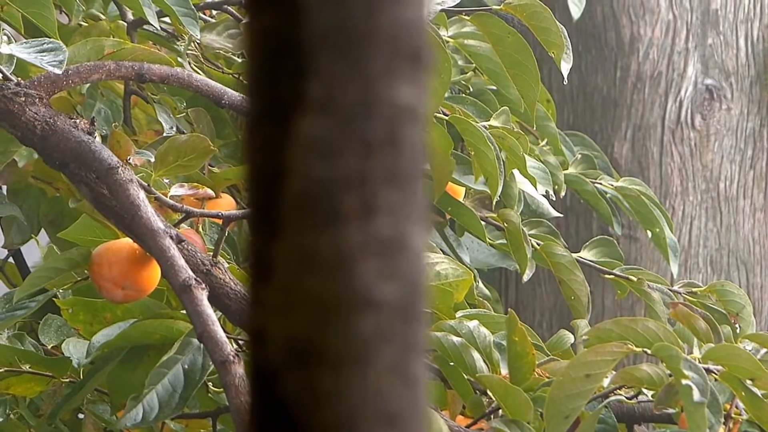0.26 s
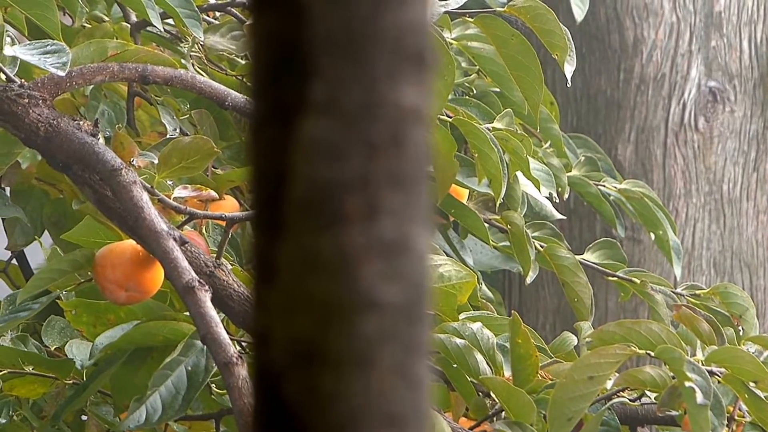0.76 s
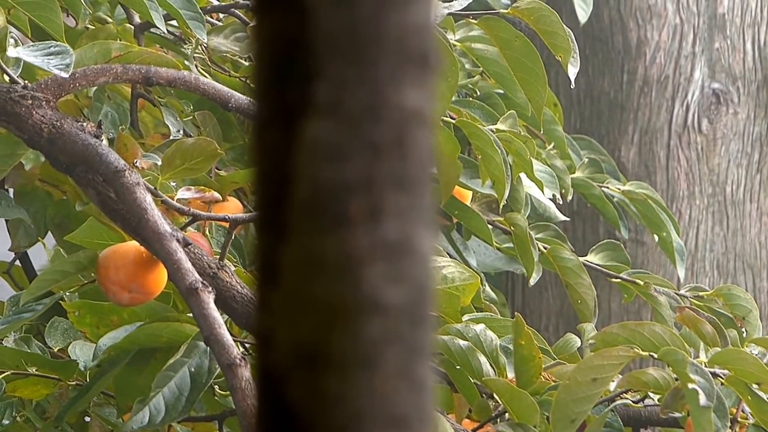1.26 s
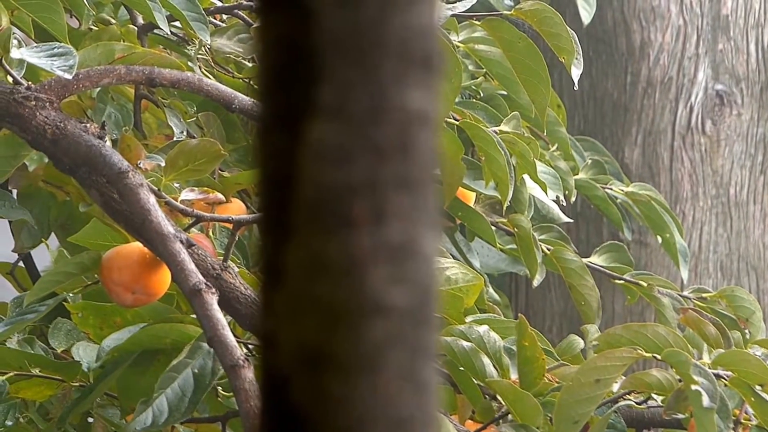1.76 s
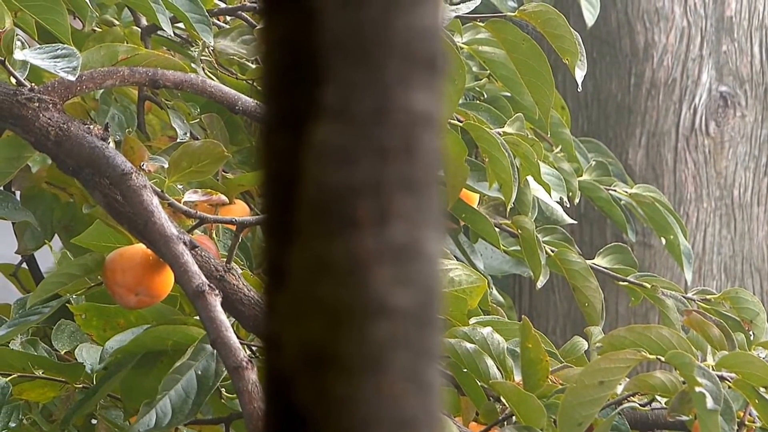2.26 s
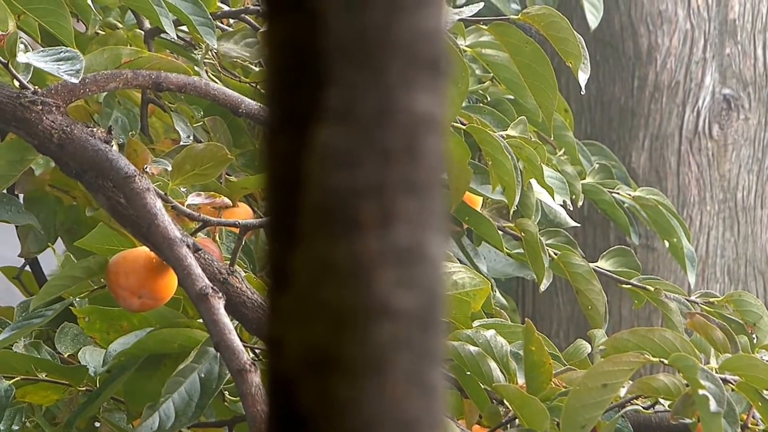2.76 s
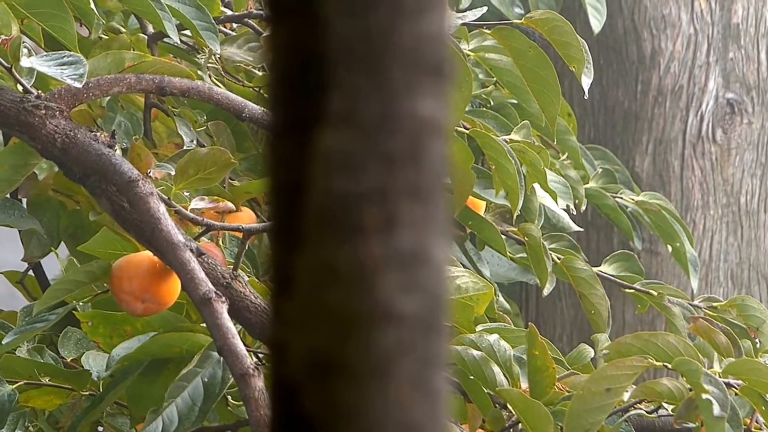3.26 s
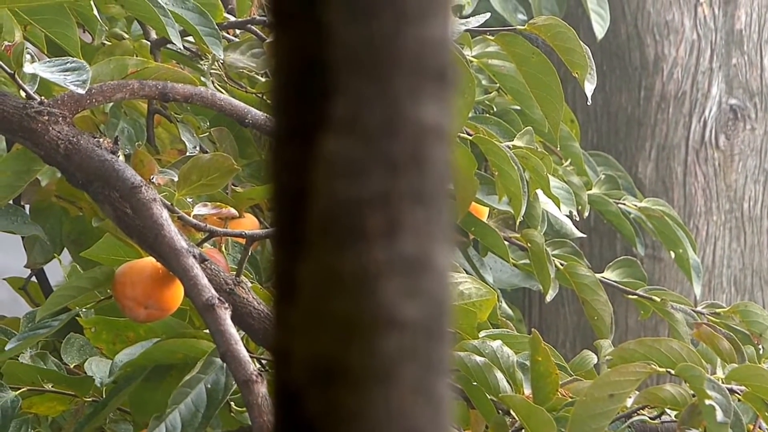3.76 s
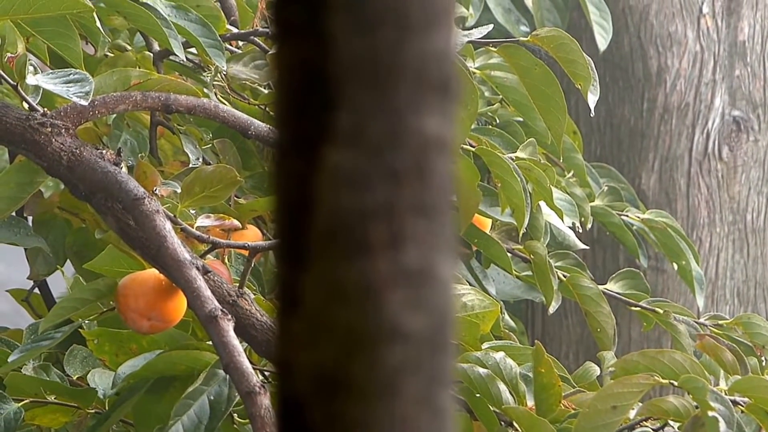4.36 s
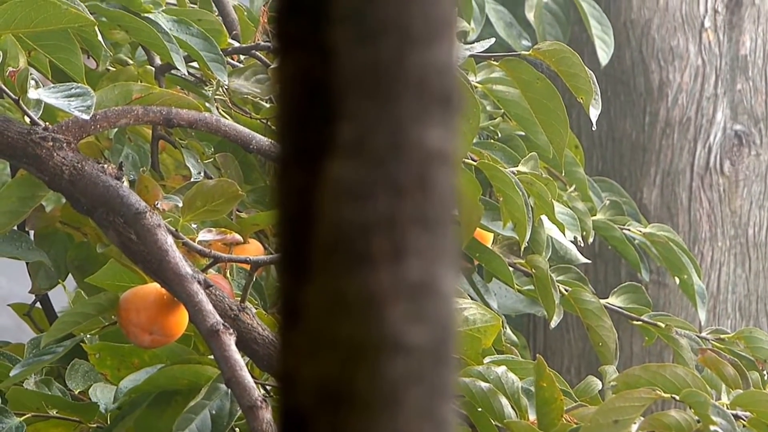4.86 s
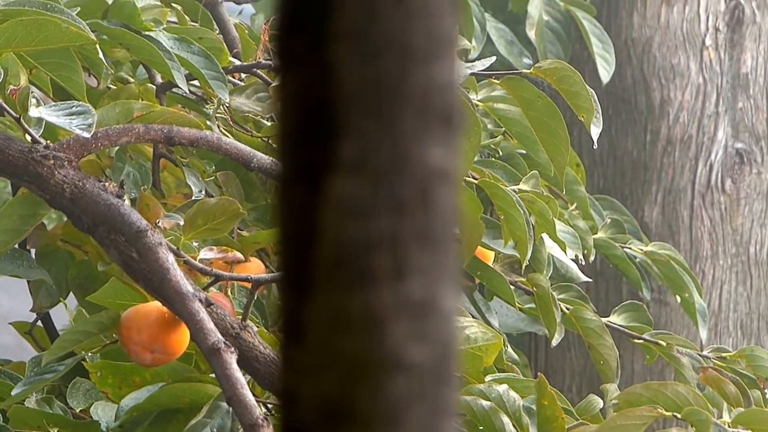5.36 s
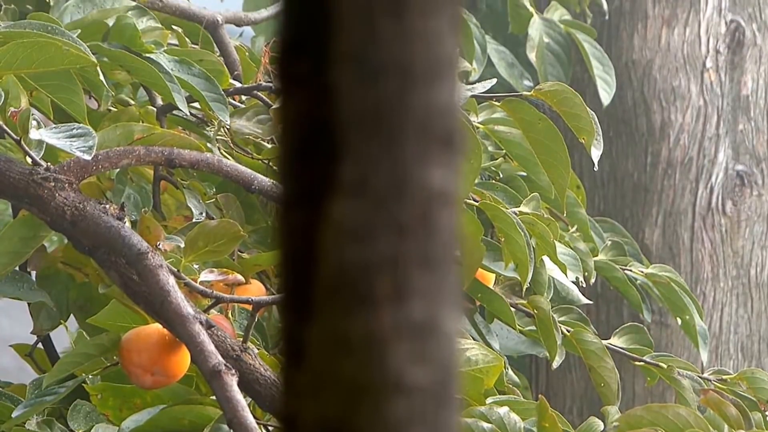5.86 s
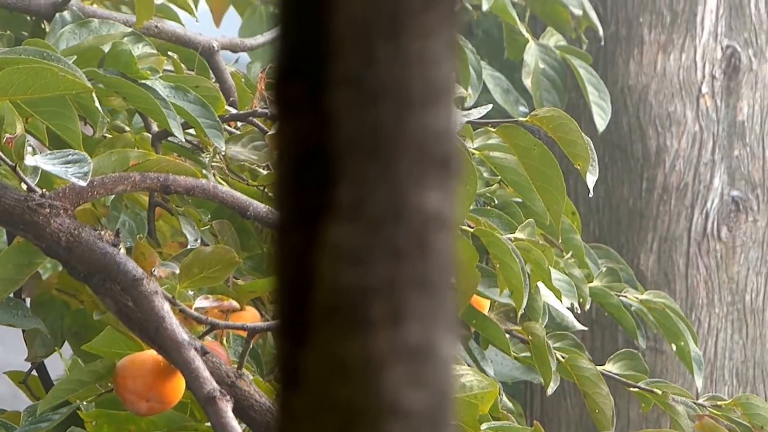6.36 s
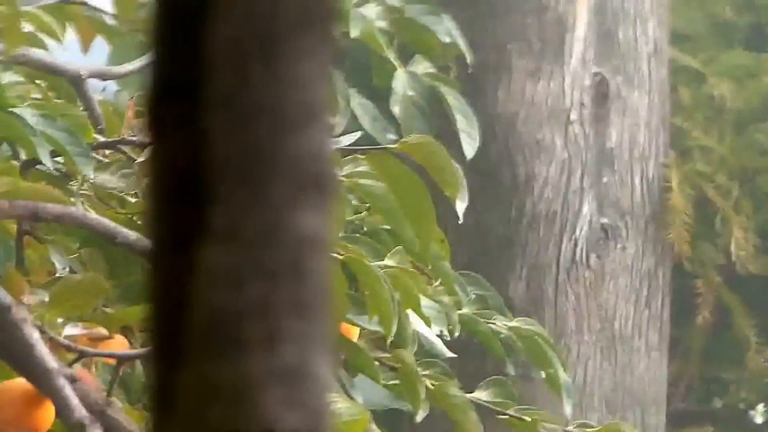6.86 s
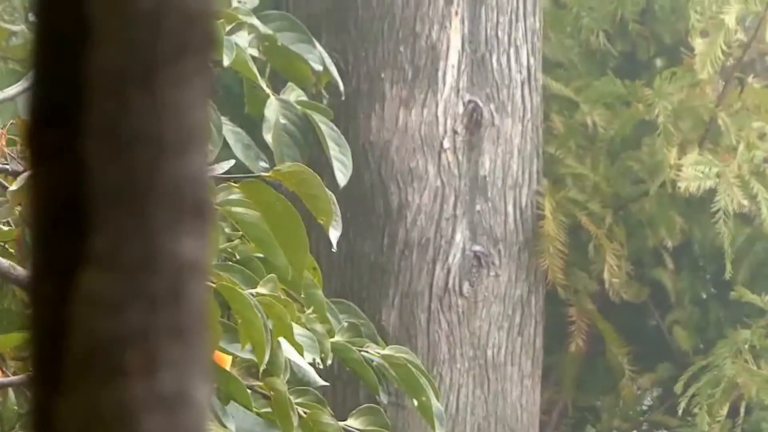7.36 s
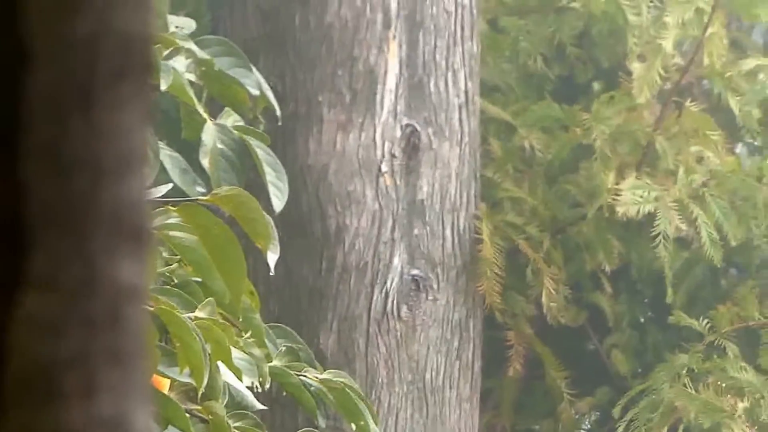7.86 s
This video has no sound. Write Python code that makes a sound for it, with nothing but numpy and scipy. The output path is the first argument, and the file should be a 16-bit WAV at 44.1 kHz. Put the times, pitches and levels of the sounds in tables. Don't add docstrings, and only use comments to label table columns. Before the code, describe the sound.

A harsh bird call dominates a quiet residential garden. Four quiet, breathy scolds lead to a long, even chatter of short buzzing notes, loudest near the middle, then lower and rougher. A dull thud and a breath of wind follow, then scattered rough scolds, small ticks and a tiny far whistle. Low hum and soft hiss lie beneath; gusts buffet the outdoor stereo microphone, and leaves scatter the calls.

```python
import sys
import numpy as np
from scipy import signal
from scipy.fft import rfft, irfft, next_fast_len
from scipy.io import wavfile

SR = 44100
rng = np.random.default_rng(int(sys.argv[2]) if len(sys.argv) > 2 else 0)


def voltage_ratio(decibels):
    exponent = np.asarray(decibels, float) / 20
    return 10 ** exponent


def transcribe(signal):
    frames = np.atleast_2d(signal).T
    limited = np.clip(frames, -1, 1)
    pcm = np.round(limited * 32767).astype(np.int16)
    wavfile.write(sys.argv[1], SR, pcm)


N = 357651


def rms_one(x):
    return x / np.sqrt(np.mean(x ** 2) + 1e-20)


def at_hz(points, hz):
    table_hz, values = np.transpose(points)
    return np.interp(np.log(hz), np.log(np.maximum(table_hz, 1)), values)


def butter(x, order, hz, kind="low"):
    return signal.sosfilt(signal.butter(order, hz, kind, fs=SR, output="sos"), x)


def wander(shape, hz):
    return rms_one(butter(rng.standard_normal(shape), 2, hz))


def resonate(x, hz, width_hz):
    r = np.exp(-np.pi * width_hz / SR)
    poles = [1, -2 * r * np.cos(2 * np.pi * hz / SR), r * r]
    return signal.lfilter(np.array([1, 0, -1]) * (1 - r * r) / 2, poles, x)


def panned(x, db):
    return np.array([x * voltage_ratio(db / 2), x * voltage_ratio(-db / 2)])


def add(out, s, x):
    i = round(s * SR)
    out[..., i:i + x.shape[-1]] += x[..., :N - i]


# [t/s,
# level/dB, pitch f/Hz, length/ms, third overtone level/dB: higher when facing the listener]
SCOLDS = [(1.2328, -50.5, 1443, 52, -6), (1.3867, -49.5, 1492, 41, -11), (1.5214, -48.5, 1512, 38.5, -11),
          (1.645, -48, 1470, 51.6, -11), (6.5913, -43, 1626, 39.2, -10), (6.7211, -40, 1814, 30, -4),
          (7.2517, -44, 1618, 27.8, 0), (7.378, -41, 1635, 25.7, 3), (7.552, -41.5, 1605, 27, -6),
          (7.95, -42.5, 1644, 34, 3), (8.1038, -42, 1620, 22, 0),
          (2.0765, -49.5, 1452, 47, -11), (2.209, -42.5, 1596, 31, -13), (2.329, -41, 1690, 32, -13),
         (2.4383, -39.5, 1748, 41.5, -0.5), (2.5584, -41.5, 1713, 47.5, 0.5), (2.6841, -43, 1818, 62, -1.5),
         (2.827, -43, 1746, 51, 2), (2.9706, -43, 1710, 52, -0.5), (3.0949, -40, 1750, 46, -0.5),
         (3.23, -41, 1752, 42.6, -2.5), (3.3544, -39.5, 1770, 38.5, -5), (3.476, -39.5, 1783, 39, -2.5),
         (3.5981, -39.5, 1786, 39, -4), (3.7183, -40, 1780, 48.4, -4), (3.835, -36.5, 1902, 36.6, -3),
         (3.9598, -38.5, 1887, 39.6, -5), (4.0839, -38, 1770, 37, -1), (4.213, -37.5, 1703, 39.5, -8.5),
          (4.391, -38.5, 1650, 30.1, -12), (4.5371, -36.5, 1710, 27.8, -12), (4.6529, -37.5, 1706, 30.1, -2),
       (4.7716, -40.5, 1605, 42.5, -7.5), (4.9069, -39, 1688, 31.7, -6), (5.0317, -40.5, 1635, 30.2, -4.5),
       (5.17, -40.5, 1620, 26.3, -8.5), (5.3055, -41.5, 1642, 27.8, -9.5), (5.4206, -41.5, 1618, 29.1, -3),
       (5.5256, -40, 1625, 30.9, -3), (5.662, -41, 1634, 29.5, -2), (5.7649, -41, 1475, 46, -5),
       (5.904, -40, 1649, 51.3, -12)]
# [t/s, fundamental level/dB, fourth overtone level/dB re third, rasp level/dB, roughness 0-1]
THROAT = [(1.2, -3.5, -17, -0.5, 0.3), (2.1, -8.5, -20, -7, 0.32), (2.44, -12, -21, 0, .28),
          (2.9, -6, -14, 2.5, 0.32), (3.2, -10.5, -19, -2, .3), (3.75, -8.5, -15, -3, 0.3),
          (4.0, -7, -21, 4.5, 0.37), (4.3, -16.5, -14, -1.5, 0.35), (4.92, -14, -12, 2, .38),
          (5.03, -11, -9, 3.5, 0.39), (5.55, -11, -4.5, 4, .45), (5.76, -6, -1, -3.5, 0.56),
          (5.9, -12, -4, 2.5, 0.21), (6.7, -7, -6.5, 5.5, 0.22), (7.4, -0.5, -7.5, 2, 0.7),
          (7.55, -5.5, -2.5, -2, 0.57), (8.1, -0.5, -10, -1.5, 0.5)]


def shrike():
    out, notes = np.zeros((2, N)), SCOLDS
    throat_s, *throat = np.transpose(THROAT)
    chances = rng.uniform(-1, 1, len(notes))
    for (s, db, pitch_hz, length_ms, facing_db), chance in zip(notes, chances):
        first_db, fourth_db, rasp_db, rough = (np.interp(s, throat_s, column) for column in throat)
        throb_ms = 8.3 + 0.04 * (length_ms - 38) + 0.7 * chance
        rasp_db += 0.3 * facing_db
        breathy = 0.35 * (db < -45)
        sound = note(pitch_hz, length_ms, throb_ms, facing_db, first_db, facing_db + fourth_db,
                     rasp_db, sag_percent=4.0, rough=rough + breathy)
        add(out, s, panned(voltage_ratio(db) * sound, -1 + 0.25 * facing_db))
    return out


HIGH_OVERTONES_DB = [-27.5, -27.5]
HALF_OVERTONES_DB = [-12, -6.5, -47]
# [f/Hz, width/Hz, level/dB]
RASP = [(1424, 540, -3.5), (3320, 1940, -1.5), (4840, 930, -0.5), (6270, 1700, -7.5), (10000, 4000, -23.5)]


def note(pitch_hz, length_ms, throb_ms, third_db, first_db, fourth_db, rasp_db, sag_percent, rough):
    ms = np.arange(4400) * 1000 / SR
    wobble, shake, flutter = wander((3, len(ms)), 330)
    through = ms / length_ms
    rough = np.clip(rough, 0.12, 0.7)
    later = np.clip((ms - 9) / 17.6, 0, 1) ** 1.39
    chaos = np.minimum(rough * (0.6 + 2.2 * later), 1)

    throbs = np.cumsum(1 + 0.6 * later + 0.17 * later * shake) * 1000 / SR / throb_ms
    part = throbs % 1
    restart = 0.3 * rng.random(60)[np.clip(throbs, 0, 59).astype(int)]
    opening = np.sin(np.pi / 2 * np.clip(part / 0.1, 0, 1))
    closing = np.cos(np.pi / 2 * part ** 1.9) ** 2
    leak = (0.12 + 0.42 * later) * (ms > 2)
    gate = opening * closing * (1 - leak) + leak
    rise = 0.6 + 0.31 * np.clip(through / 0.41, 0, 1)
    swell = rise * voltage_ratio(-24 * np.clip(through - 0.75, 0, 9) ** 1.44 / 0.8)

    sag = sag_percent / 100 * (through - 1.906 * np.minimum(through, 1.3) ** 3)
    arch = 0.012 * np.sin(np.pi * part) + sag
    jitter = 0.032 * (0.3 + rough + 0.8 * chaos) * wobble
    cycles = restart + np.cumsum(pitch_hz * (1 + arch + jitter)) / SR
    levels_db = [first_db - 2.5 * later, 0, third_db, fourth_db] + HIGH_OVERTONES_DB
    drifts = wander((6, len(ms)), 180)
    voice = sum(voltage_ratio(db + 1.8 * drift) * np.sin(2 * np.pi * k * cycles + k * k)
                for k, db, drift in zip(range(1, 7), levels_db, drifts))
    halves = sum(voltage_ratio(db) * np.sin(2 * np.pi * (k + 1.5) * cycles)
                 for k, db in enumerate(HALF_OVERTONES_DB))

    white = rng.standard_normal(len(ms))
    white = white * voltage_ratio(3.5 * np.clip(wander(len(ms), 400), -2, 2))
    gape = (pitch_hz / 1700) ** 0.55
    throat = sum((-1) ** k * voltage_ratio(db) * resonate(resonate(white, hz * gape, width), hz * gape, width)
                 for k, (hz, width, db) in enumerate(RASP))
    rasp = rms_one(throat) + halves * voltage_ratio(8.1 * np.clip(flutter, -2, 1.5) - 1)
    rasp_share = 0.18 + rough * (1 - later) + later
    sound = voice * (1 - 0.41 * chaos) + voltage_ratio(rasp_db - 6) * rasp_share * rasp
    return sound / np.sqrt(np.mean(sound[ms < length_ms] ** 2)) * gate * swell * 1.625


# [delay t/s, level/dB, left-right level/dB]
ECHOES = [
    (.031, -22, -22),
    (.079, -22.5, -12.5),
]
# [60 dB decay t/s, level/dB]
SCATTER = [
    (.12, -3),
    (.75, -4.5),
]
# [f/Hz, left lead/rad]
PORT_LEAD = [(1600, .3), (3600, .4), (5000, 1.5), (7500, .4)]


def garden(x):
    s = np.arange(SR * 3 // 4) / SR
    shared, *own = rng.standard_normal((3, len(s)))
    shared = butter(shared, 2, 4300)
    decay = sum(voltage_ratio(db - 60 * s / t60) * np.sqrt(2 * np.log(1000) / t60 / SR) for t60, db in SCATTER)
    onset = np.clip((s - 0.002) / 0.0014, 0, 1)
    response = (shared + 0.73 * np.array(own)) * decay * onset
    for delay, db, pan_db in ECHOES:
        smear = rng.standard_normal(200) + 1.25 * rng.standard_normal((2, 200))
        smear = smear * np.exp(-np.arange(200) / 80)
        i = round(delay * SR)
        response[:, i:i + 200] += panned(voltage_ratio(db), pan_db)[:, None] * smear / 5.8
    response = butter(response, 1, [3800, 6000], "band")
    size = next_fast_len(N + len(s))
    hz = np.arange(1, size // 2 + 2) * SR / size
    lead = np.exp(1j * at_hz(PORT_LEAD, hz) * [[0.5], [-0.5]])
    direct = rfft(x, size) * lead
    scattered = rfft(x.mean(axis=0), size) * rfft(response, size)
    return irfft(direct + scattered, size)[:, :N]


# [t/s, length/s, middle f/Hz, glide/Hz, level/dB]
WHISTLES = [(.122, .02, 3200, -350, -60), (0.271, 0.013, 3400, 650, -57), (0.291, 0.021, 3700, -410, -56),
            (.413, 0.014, 3250, -350, -61), (.438, .022, 4180, 100, -64), (.474, .014, 3740, -250, -61),
            (0.521, 0.06, 3520, -1020, -60.5), (0.612, .028, 3330, 900, -63), (7.727, 0.016, 3700, 58, -59),
            (7.742, .022, 3830, 400, -57), (7.757, .031, 3700, -700, -58), (7.738, 0.016, 5050, 700, -63),
            (7.754, .017, 5120, -500, -62)]
# [t/s, level/dB]
BLUR = [
    (0.0, -47.5),
    (0.496, -62),
    (0.648, -79),
    (0.978, -65),
    (1.22, -52),
]


def songbird():
    out = np.zeros(N)
    for s, length, middle_hz, glide_hz, db in WHISTLES:
        part = np.linspace(-1, 1, round(length * SR))
        hz = middle_hz + glide_hz / 2 * part
        level = voltage_ratio(db + 1.5 + 3.7 * wander(len(hz), 300)) * np.hanning(len(hz)) ** 0.5
        add(out, s, level * np.sin(2 * np.pi * np.cumsum(hz) / SR))
    s, db = np.transpose(BLUR)
    white = rng.standard_normal((2, N))
    blur = rms_one(resonate(white, 3300, 370) - 0.7 * resonate(white, 4500, 500))
    blur_db = np.interp(np.arange(N) / SR, s, db, right=-99) - 12
    return panned(out, -1) + blur * voltage_ratio(blur_db)


# [t/s, level/dB, centre f/Hz, width/Hz, decay/ms]
KNOCKS = [
    (0.17, -50, 210, 590, 74),
    (.188, -60, 2120, 60, 41),
    (5.935, -45.5, 320, 840, 35),
    (1.324, -50, 700, 200, 13),
    (7.035, -46, 2500, 2100, 3.4),
    (7.3463, -30.5, 2350, 1300, .9),
    (7.3463, -40, 1100, 900, .9),
    (0.18, -61, 200, 200, 19),
    (7.984, -48.5, 950, 880, 17),
    (5.8, -65, 180, 69, 120),
]


def knocks():
    out, ms = np.zeros((2, N)), np.arange(8000) * 1000 / SR
    for s, db, hz, width_hz, decay_ms in KNOCKS:
        noise = rng.standard_normal(len(ms)) + 1.15 * rng.standard_normal((2, len(ms)))
        burst = noise * np.exp(-ms / decay_ms) * np.clip(ms / (0.38 * decay_ms), 0, 1)
        body = resonate(resonate(burst, hz, width_hz), hz, 2 * width_hz)
        add(out, s, voltage_ratio(db) * body * np.sqrt(SR / width_hz / 2))
    return out


def wind():
    buffet_gain, rumble_gain = gusting(np.arange(N) / SR)
    shared, *own = rng.standard_normal((3, N))
    ports = 0.6 * shared + np.array(own)
    buffet = rms_one(butter(ports, 2, [21, 38], "band"))
    rumble = rms_one(butter(ports, 2, [70, 260], "band"))
    hum = rms_one(resonate(ports[:, ::-1], hz=151, width_hz=4))
    return buffet * buffet_gain + rumble * rumble_gain * voltage_ratio(-8) + hum * voltage_ratio(-63.5)


# [t/s, buffet level/dB]
BREEZE = [
    (0, -56),
    (2.0, -58),
    (4.5, -58),
    (6.3, -57.5),
    (8.11, -53),
]
# [t/s, half length/s, buffet level/dB, rumble level/dB]
GUSTS = [(0.017, 0.064, -70, -54), (1.36, 0.08, -48.5, -52), (2.82, 0.056, -47.5, -62),
         (3.817, .1, -56.5, -61), (4.6, .1, -56, -56), (5.208, 0.046, -45.5, -48.5),
         (5.96, 0.029, -65, -42.5), (6.054, .04, -49, -56), (6.238, 0.066, -53.5, -53),
         (6.773, 0.079, -46.5, -52), (7.214, 0.19, -52.5, -49), (7.53, 0.04, -54, -47),
         (7.822, .06, -54, -55), (8.027, 0.048, -53, -48.5)]


def gusting(t):
    lumps_db = 2 * wander((2, N), 3.7)
    rumble_under_db = -0.5
    breeze_db = np.interp(t, *np.transpose(BREEZE)) + lumps_db + [[0], [rumble_under_db]]
    power = voltage_ratio(breeze_db) ** 2
    for s, half, *db in GUSTS:
        power += voltage_ratio(np.array(db))[:, None] ** 2 * np.exp(-((t - s) / half) ** 2)
    return np.sqrt(power)


# [f/Hz, level/dB per Hz]
AIR = [(35, -34), (60, -5), (124, 0.5), (184, -4), (363, -5), (408, -6), (579, -6), (767, -7.5), (1310, -9),
       (2090, -13), (3420, -13), (4120, -14), (5460, -17.5), (16000, -19)]
# [f/Hz, correlation]
LIKENESS = [(60, 1), (180, 0.13), (550, 0.046), (1650, 0.22), (4970, 0.047), (15000, 0.021)]
# [f/Hz, left-right level/dB]
LEAN = [(60, -4.5), (240, -4), (950, -1.5), (3770, -2), (15000, 0.5)]


def air(patchy_db):
    out, edges = 0, 56 * 2 ** np.arange(0, 8.5, 0.4)
    white = rng.standard_normal((2, 2, N))
    for k, (low, high) in enumerate(zip(edges, edges[1:])):
        mid, side = butter(white[k % 2], 2, [low, high], "band")
        hz = np.sqrt(low * high)
        alike = np.clip(at_hz(LIKENESS, hz), -1, 1)
        patches = np.repeat(wander(N // 100 + 1, 460), 100)[:N]
        patches = patchy_db * (hz < 5000) * patches
        band = np.sqrt(1 + alike) * mid + np.sqrt(1 - alike) * side * [[1], [-1]]
        out = out + band * panned(voltage_ratio(at_hz(AIR, hz) + patches), at_hz(LEAN, hz))
    return voltage_ratio(-55 + 3) * rms_one(out)


def scene():
    return garden(shrike()) + songbird() + knocks() + air(patchy_db=0.9) + wind()


def roll_off(x):
    return signal.sosfilt(signal.butter(12, 16820, fs=SR, output="sos"), x)


def record(dry):
    top_cut = signal.ellip(12, 0.3, 75, 15780, fs=SR, output="sos")
    mix = signal.sosfilt(top_cut, dry)
    return roll_off(mix)


dry = scene()
out = record(dry)
transcribe(out)
```